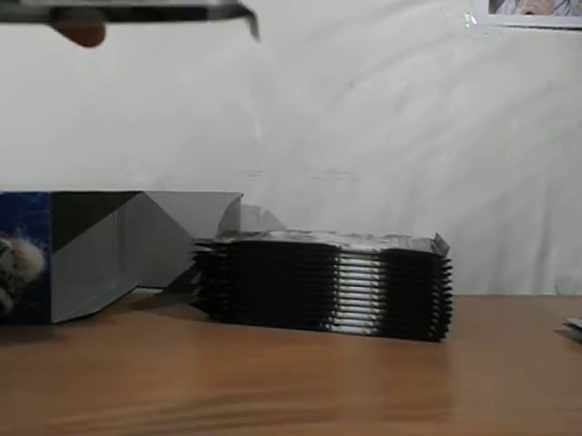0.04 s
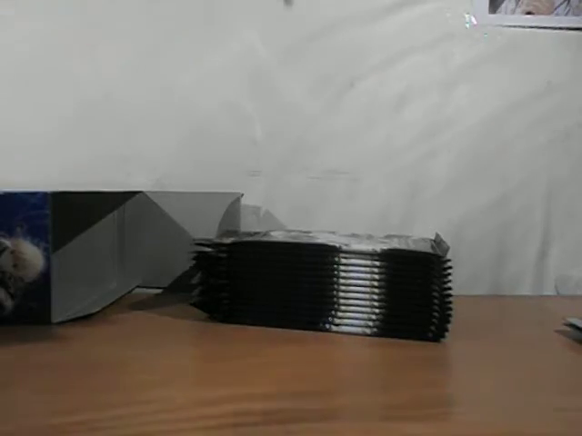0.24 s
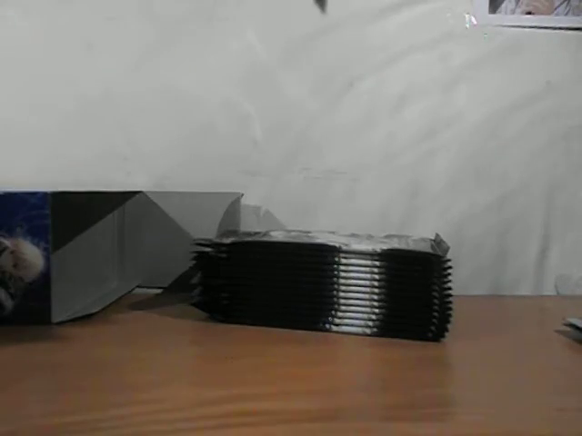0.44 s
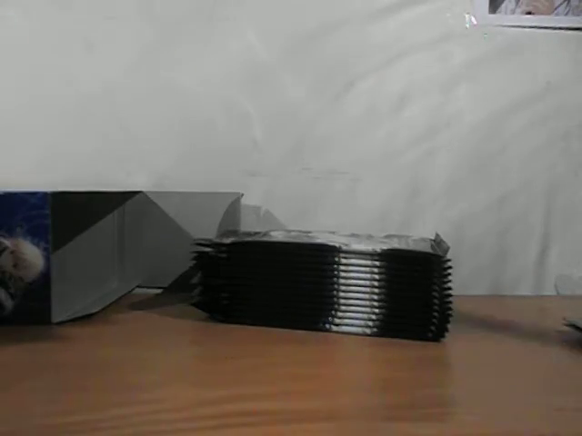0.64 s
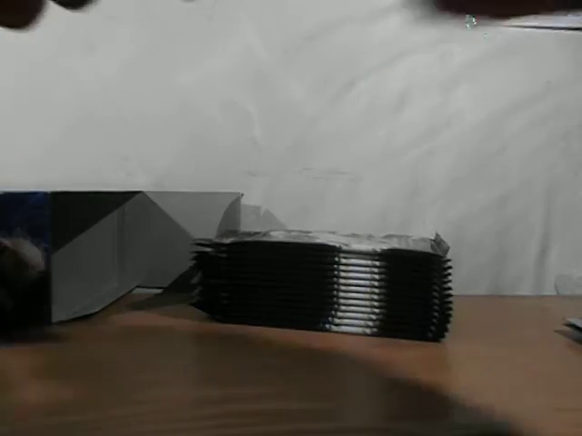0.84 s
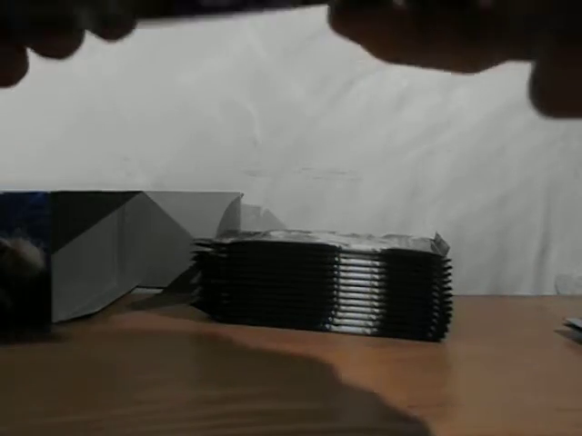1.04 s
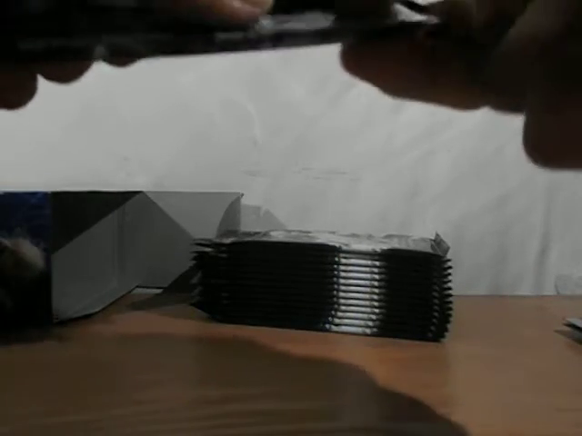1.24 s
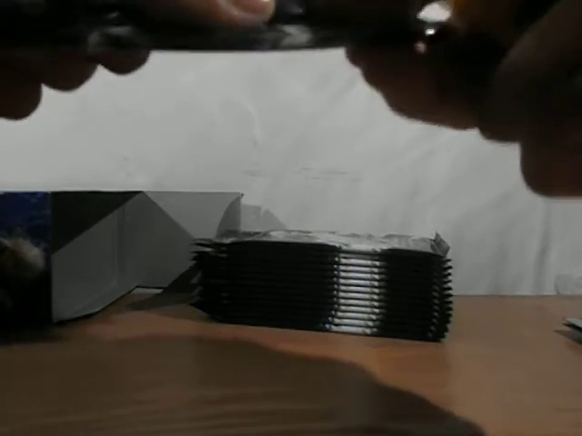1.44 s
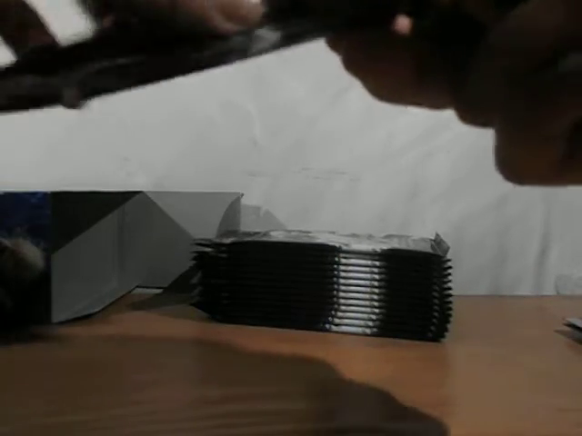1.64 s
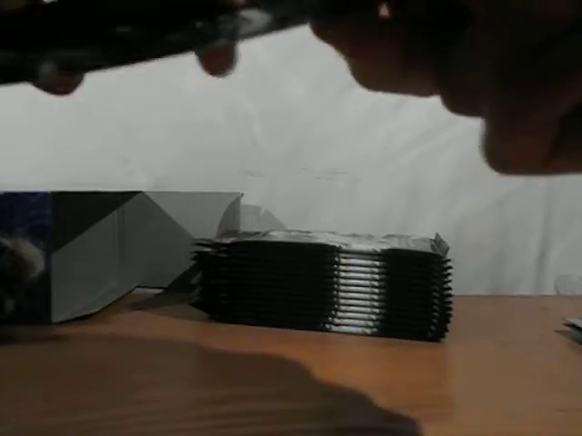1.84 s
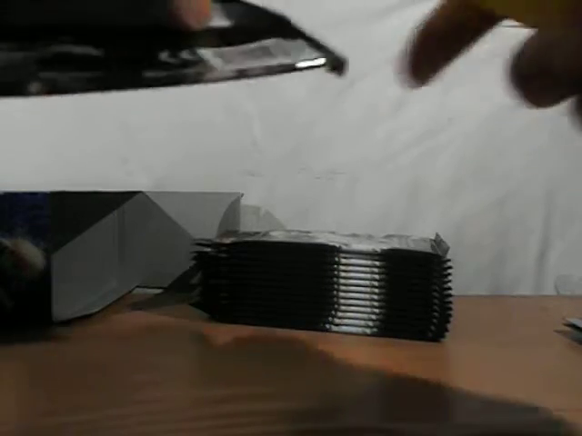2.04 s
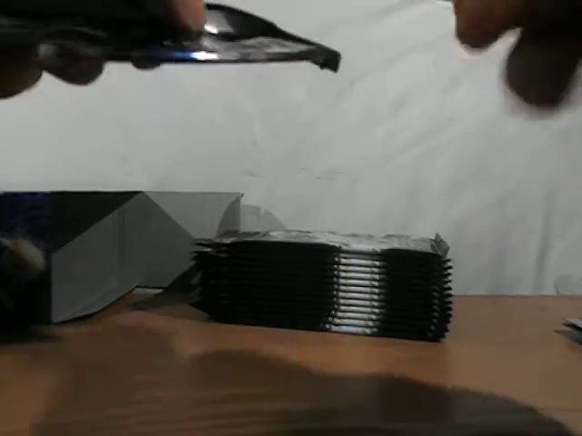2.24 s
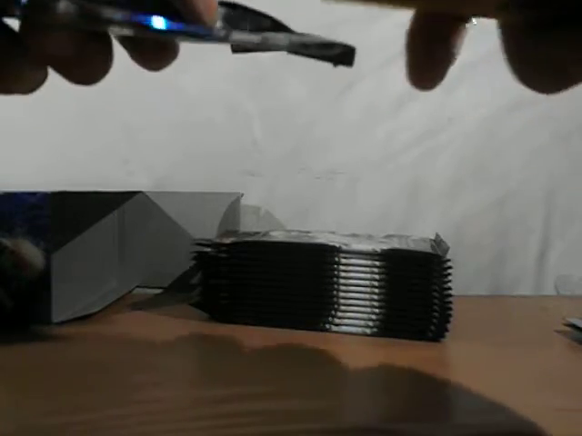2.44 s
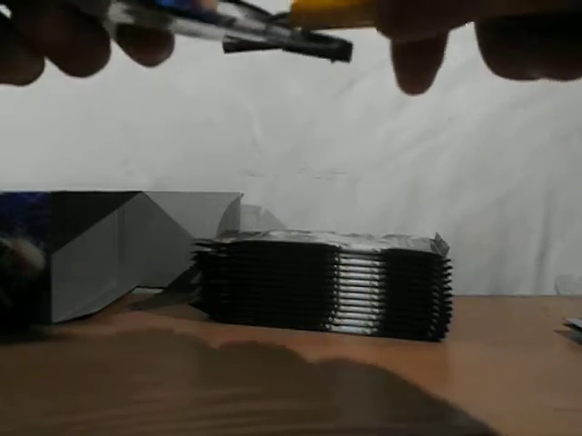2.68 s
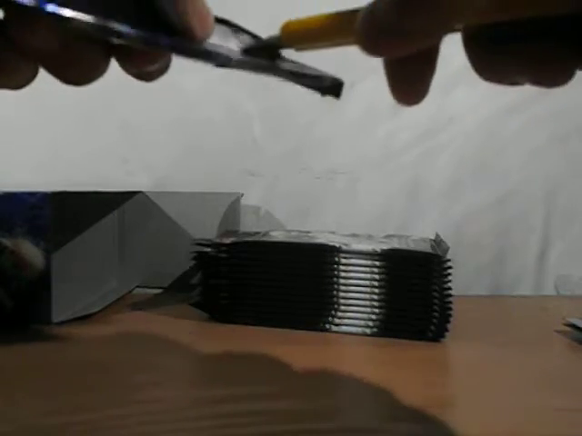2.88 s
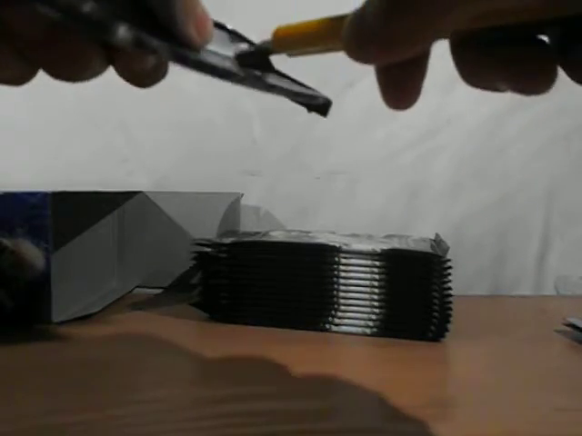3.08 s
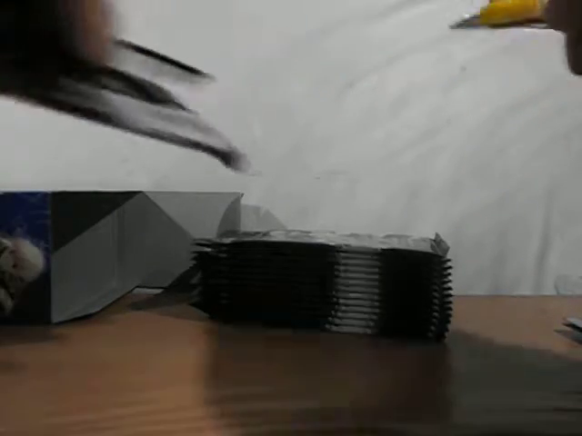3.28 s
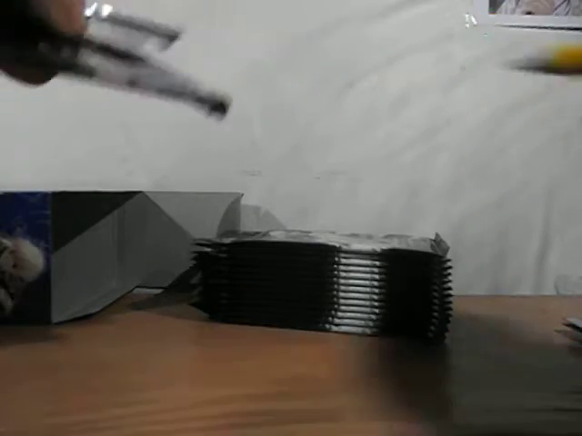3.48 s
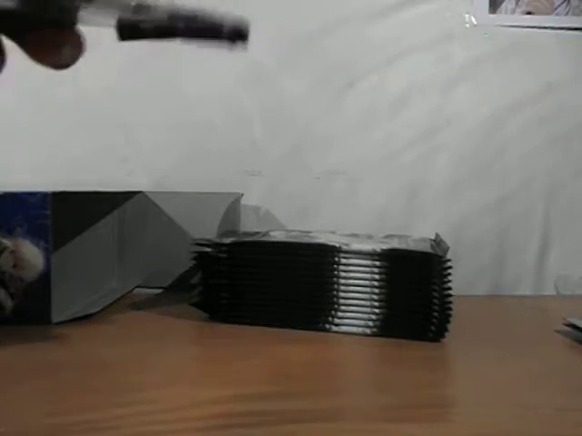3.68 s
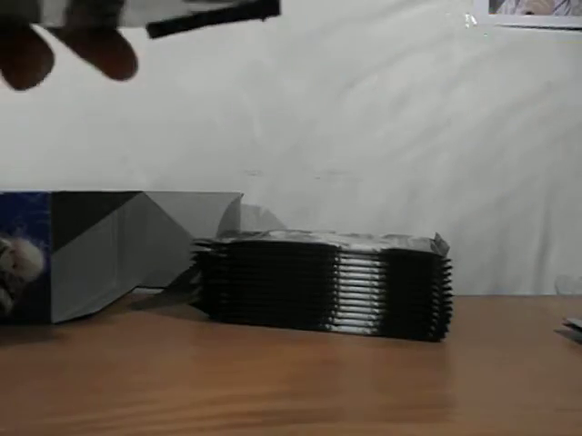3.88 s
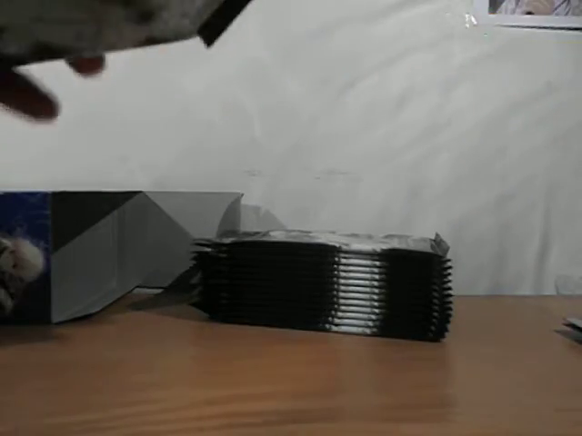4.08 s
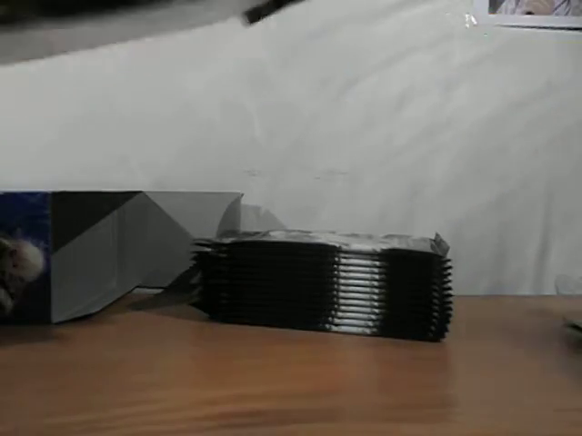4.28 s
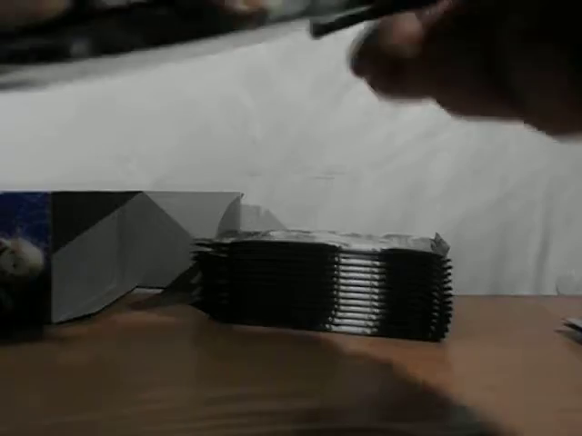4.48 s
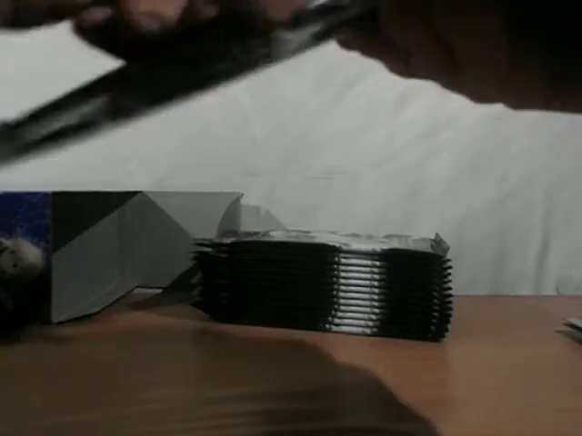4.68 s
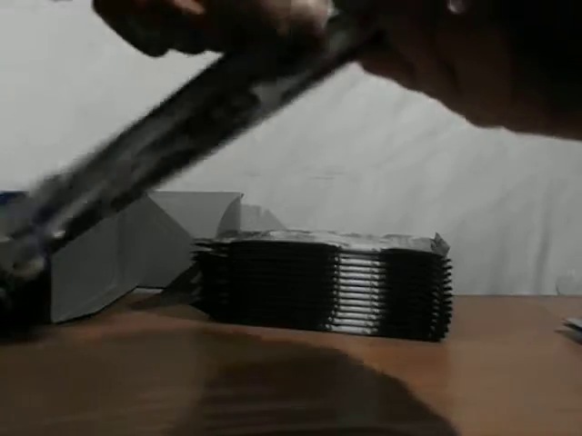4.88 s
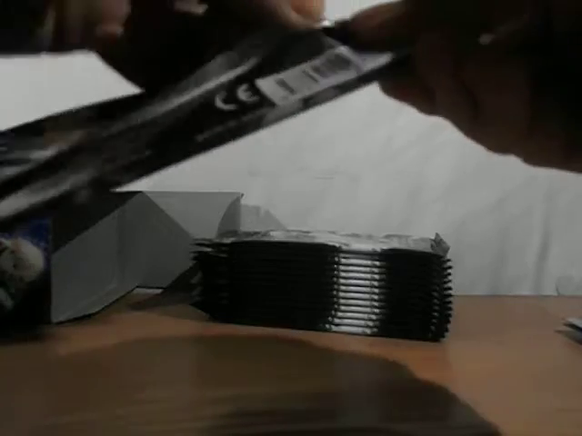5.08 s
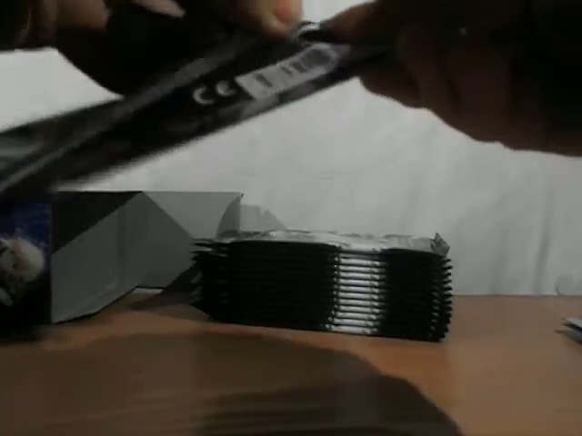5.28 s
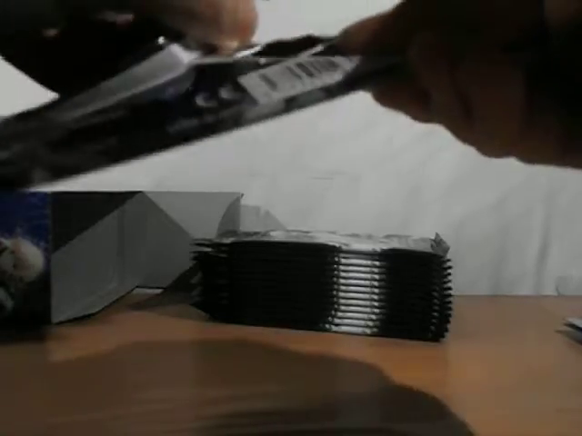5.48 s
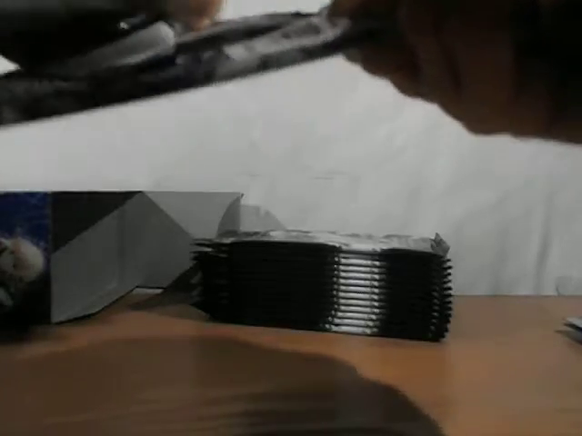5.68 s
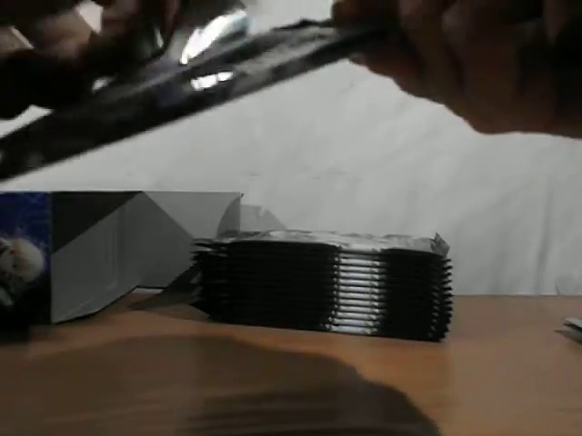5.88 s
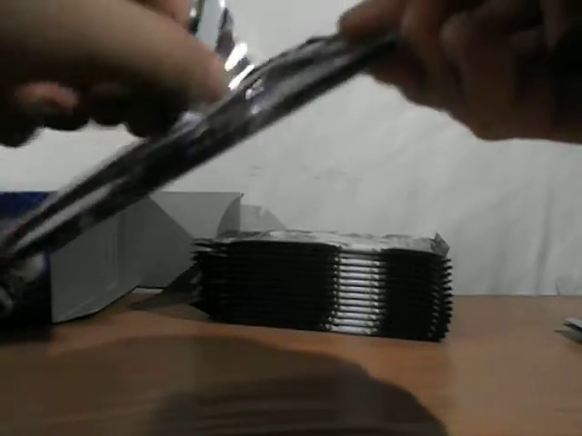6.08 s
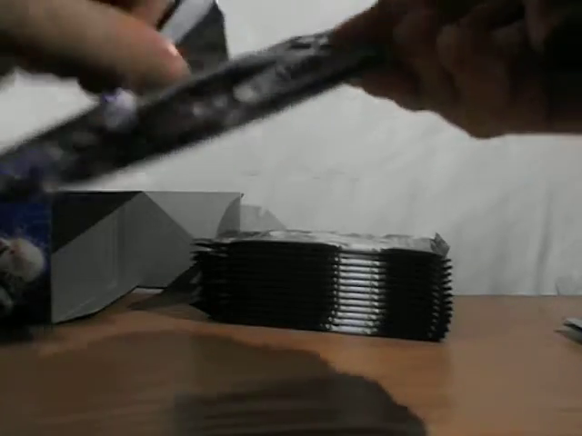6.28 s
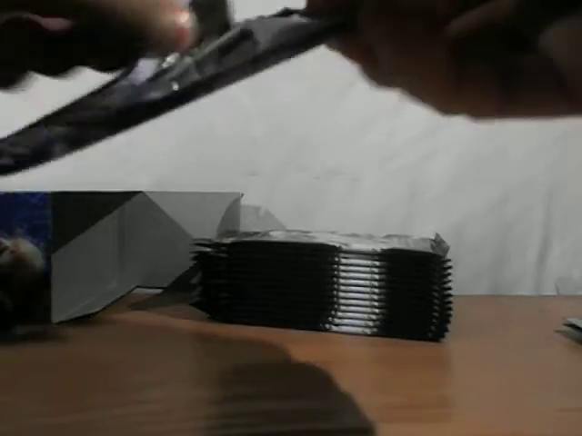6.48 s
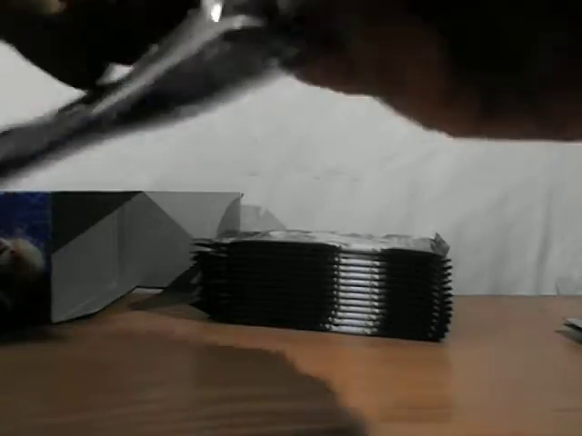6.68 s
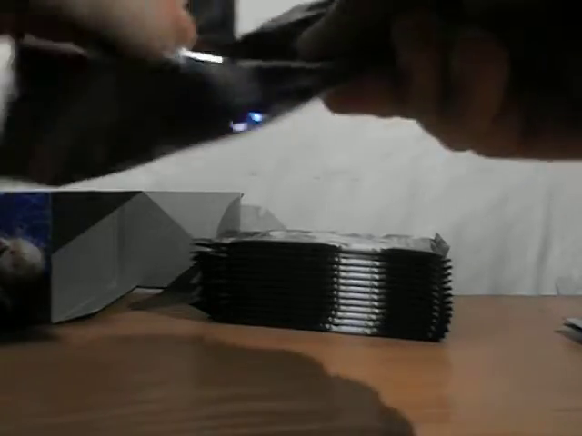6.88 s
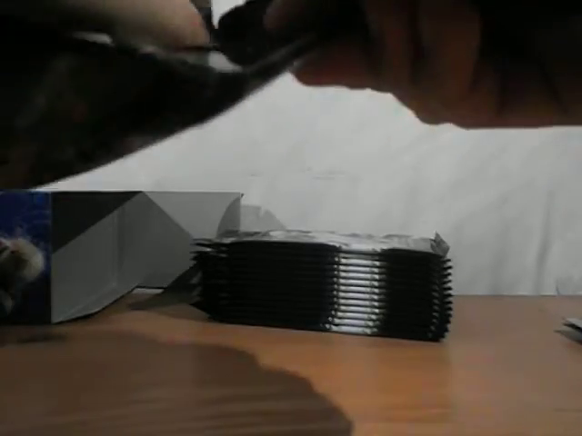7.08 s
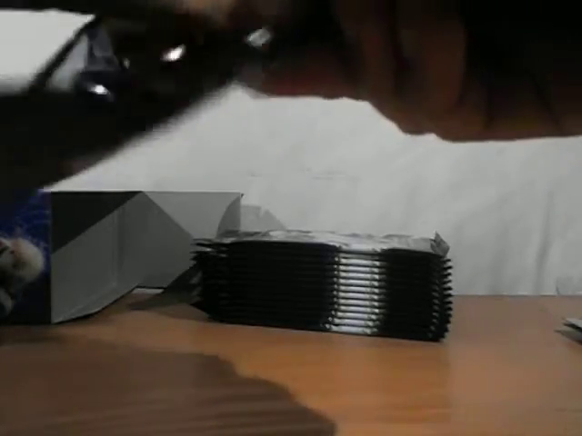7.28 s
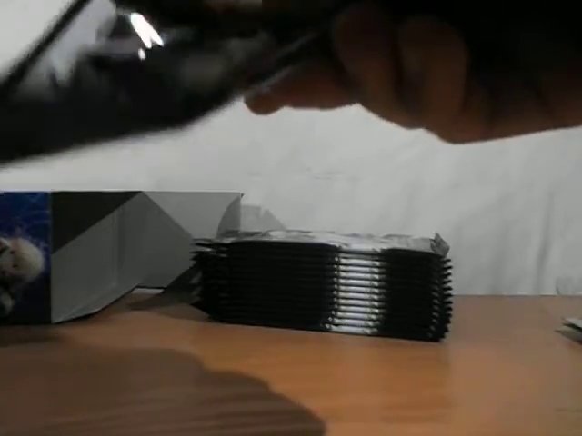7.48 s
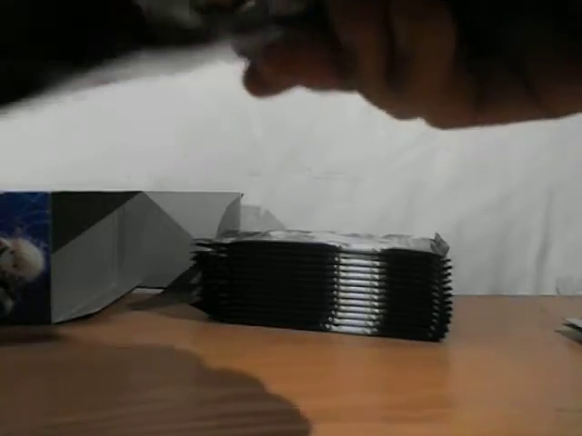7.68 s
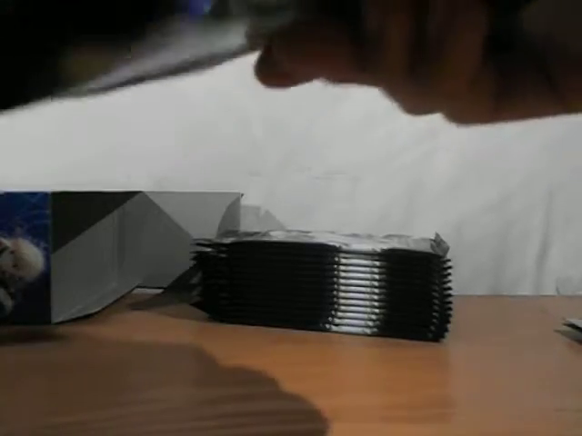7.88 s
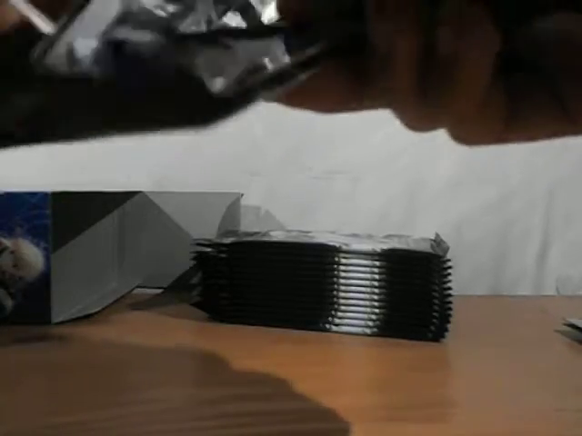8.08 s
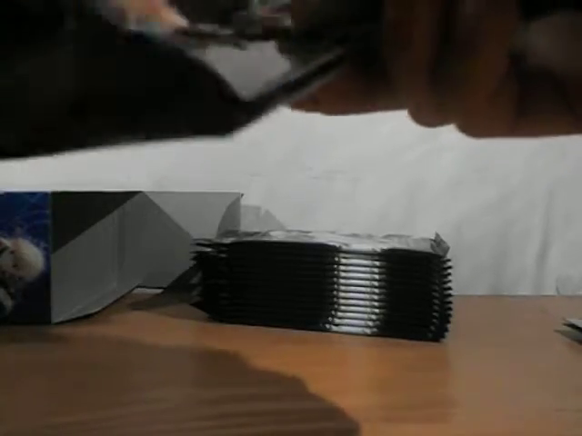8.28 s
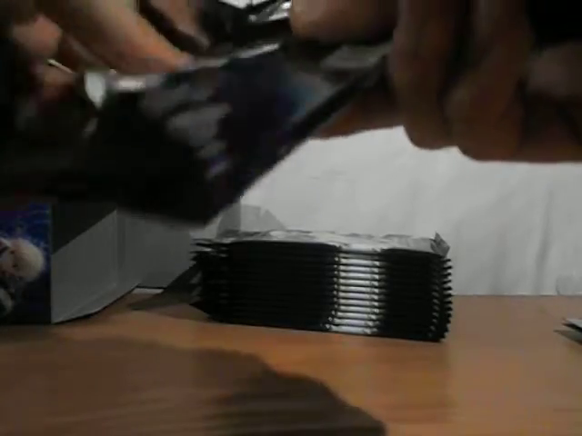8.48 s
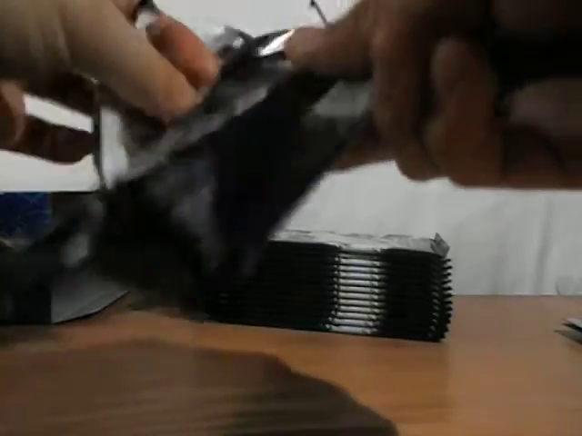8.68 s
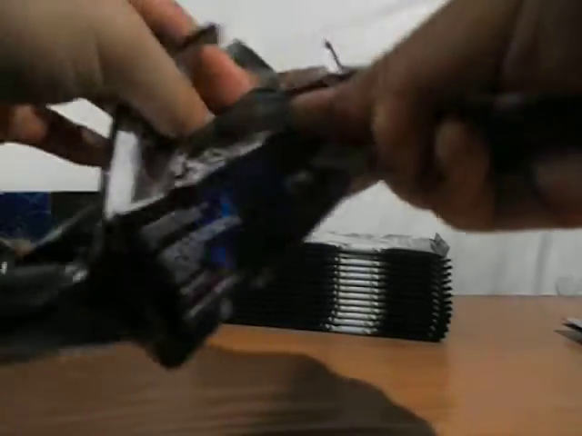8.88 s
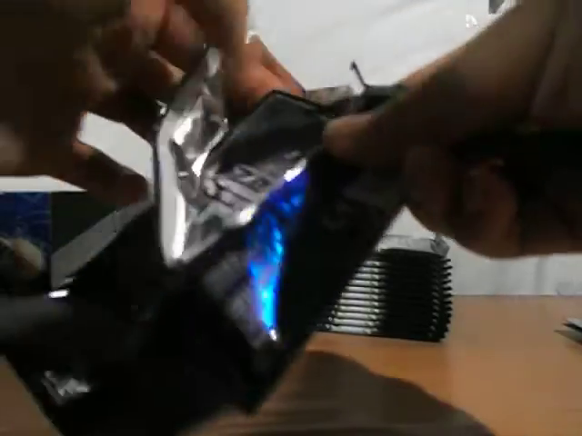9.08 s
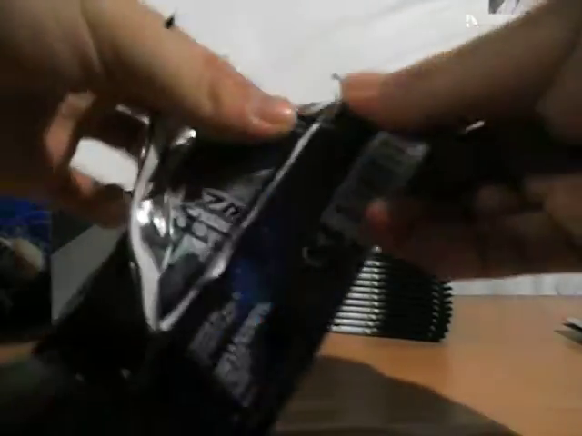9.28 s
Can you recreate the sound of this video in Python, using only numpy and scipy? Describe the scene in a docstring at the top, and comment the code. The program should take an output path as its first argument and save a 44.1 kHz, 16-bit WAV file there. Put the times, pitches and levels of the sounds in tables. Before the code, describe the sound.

Crisp foil packet crinkles and snaps close up, sparse at first, then denser and louder as its seam is tugged and torn open in a quiet room.

```python
"""A foil pack is crinkled, pulled and torn by hand, close to a small camera in a quiet room.
Creases are noise bursts ringing near 3-5 kHz with a low pouch thud, alone or in dense crackle.
The glued seam lets go in runs of quick slips; the table is bumped, and decaying sines thump and sway low.
Beneath lie hiss, hum and rumble. The camera cuts off near 6 kHz and overloads on the loudest snaps."""
import sys
import numpy as np
from scipy import signal
from scipy.fft import rfft, irfft
from scipy.io import wavfile
from scipy.ndimage import uniform_filter1d

SR = 44100
rng = np.random.default_rng(int(sys.argv[2]) if len(sys.argv) > 2 else 0)


def to_wav(s):
    """Save 16-bit WAV."""
    ch = np.atleast_2d(s).T  # columns
    pcm = np.round(np.clip(ch, -1, 1) * 32767)  # PCM
    wavfile.write(sys.argv[1], SR, pcm.astype(np.int16))


def rack_gain(trim_db):
    """Turn a fader trim in dB into the linear factor to multiply a signal by."""
    fader = np.asarray(trim_db, float)
    return 10 ** (fader / 20)


N = 411453


def evened(x):
    """Scales to rms 1."""
    return x / np.sqrt(np.mean(x ** 2) + 1e-20)


def read(points, hz):
    """Reads a spectrum table, linear in log frequency."""
    f, value = np.transpose(points)
    return np.interp(np.log(hz + 1), np.log(f + 1), value)


def curve(rows):
    """Draws a (time, value) table as straight segments, one value a sample."""
    s, value = np.transpose(rows)
    return np.interp(np.arange(N) / SR, s, value)


def coloured(gain):
    """Noise of rms 1 with the spectrum gain(hz)."""
    hz = np.fft.rfftfreq(N + 1, 1 / SR)
    spectrum = rfft(rng.standard_normal(N + 1)) * gain(hz)
    return evened(irfft(spectrum)[:N])


# colour of hiss and room tone: (frequency [Hz], relative level [dB])
ROOM_COLOUR = [(50, -11), (170, -2), (360, -14.5), (620, -11.5), (2470, -13.5), (3610, -17.5),
               (4910, -12.5), (5800, -25.5)]
# air movement at the microphone: (time [s], level [dB])
RUMBLE_LEVEL = [(0, -42.5), (9.33, -41)]


def background(tone_db=-53, hum_hz=119, hum_db=-59.5):
    """Steady hiss and room tone, a wavering narrow-band hum and a slow unsteady rumble."""
    tone = rack_gain(tone_db) * coloured(lambda hz: rack_gain(read(ROOM_COLOUR, hz)))
    hum = rack_gain(hum_db) * coloured(lambda hz: 1 / (1 + ((hz - hum_hz) / 4) ** 2))
    rumble = rack_gain(curve(RUMBLE_LEVEL)) * coloured(lambda hz: hz / (1 + (hz / 42) ** 5))
    return tone + hum + rumble


# low thumps and slow sways: (time [s], swing level before decay [dB], swing rate [Hz])
LOW_SWINGS = [(3.156, -19.5, 11), (5.277, -26.5, 14), (6.162, -20, 138), (6.629, -25.5, 65),
              (7.759, -24, 9)]


def low_swings(cycles=1.5):
    """Low thumps and slow sways: each a low swing that dies within a few cycles."""
    t, out = np.arange(N) / SR, np.zeros(N)
    for s, db, hz in LOW_SWINGS:
        since_s = t - s
        decay = np.exp(-np.maximum(since_s, 0) * hz / cycles)
        out += rack_gain(db) * np.sin(2 * np.pi * hz * since_s) * decay * (since_s > 0)
    return out


# low modes of the table: (frequency [Hz], starting level [dB], t60 [s])
TABLE_MODES = [(149.3, -0.5, 0.14), (210.5, -3, .06), (327, -7, 0.037), (587, 0, .03), (955, -2, 0.016)]
# hands against the table: (time [s], peak [dB], length of the push [s])
TABLE_BUMPS = [(4.113, -39, 0.017), (4.149, -13, 0.01), (4.523, -26, 0.029), (4.557, -19, 0.0565),
               (4.788, -32, 0.012), (6.639, -27, 0.016)]


def bumps():
    """A rough push, held for its length, rings the table's low modes through the camera's feet."""
    t, out = np.arange(SR // 2) / SR, np.zeros(N + SR)
    modes = sum(rack_gain(db - 60 * t / t60) * np.cos(2 * np.pi * hz * t) for hz, db, t60 in TABLE_MODES)
    for s, db, push_s in TABLE_BUMPS:
        rough = uniform_filter1d(rng.standard_normal(len(t)), 1 + round(push_s * SR / 20))  # slow is soft
        push = rough * np.exp(-(t / max(push_s, .001)) ** 3)
        knock = signal.fftconvolve(push, modes)[:len(t)]
        out[round(s * SR):][:len(t)] += rack_gain(db) * knock / abs(knock).max()
    return out[:N]


# squeezes: (time of the top [s], handling level there [dB], swell [s], fade [s])
SQUEEZE_TOPS = [(0.018, -37, 0.049, 0.021), (0.1, -42, 0.058, 0.14), (0.378, -35, 0.0096, 0.02),
                (0.68, -48, 0.026, 0.029), (0.892, -30.5, 0.029, 0.011), (0.99, -42, 0.058, 0.19),
                (1.258, -37, 0.011, 0.11), (1.43, -39, 0.075, 0.02), (1.499, -29.5, 0.031, 0.32),
                (1.649, -26.5, 0.014, 0.014), (1.89, -31.5, 0.065, 0.048), (2.031, -34.5, 0.047, 0.026),
                (2.151, -37.5, 0.075, 0.037), (2.36, -36, 0.03, 0.01), (2.879, -33.5, 0.14, 0.16),
                (3.161, -27.5, 0.034, 0.05), (3.37, -39.5, 0.045, 0.052), (3.491, -33.5, 0.045, 0.075),
                (4.021, -40, 0.085, 0.033), (4.161, -23, 0.045, 0.024), (4.511, -32, 0.042, 0.058),
                (4.629, -31, 0.028, 0.13), (4.918, -34.5, 0.16, 0.17), (5.029, -21, 0.014, 0.017),
                (5.313, -27, 0.081, 0.053), (5.778, -36.5, 0.14, 0.2), (6.062, -29, 0.059, 0.028),
                (6.148, -22, 0.025, 0.037), (6.499, -28, 0.087, 0.091), (6.65, -29, 0.23, 0.067),
                (6.77, -23.5, 0.21, 0.016), (7.049, -22.5, 0.073, 0.093), (7.251, -26.5, 0.11, 0.041),
                (7.362, -29.5, 0.074, 0.079), (7.57, -21.5, 0.092, 0.018), (7.74, -14.5, 0.029, 0.058),
                (8.0, -32, 0.083, 0.14), (8.268, -29, 0.14, 0.039), (8.58, -35, 0.12, 0.23),
                (8.77, -32, 0.034, 0.058), (8.98, -28, 0.054, 0.072), (9.171, -20.5, 0.034, 0.035),
                (9.33, -27, 0.072, 0.021)]
# merely holding the pack: (time [s], handling level [dB])
GRIP_LEVEL = [(0, -53), (2.5, -49), (4.4, -48.5), (6.3, -44.5), (7.65, -47), (7.8, -36), (9.33, -41)]


def handling(swell_db=15):
    """Handling level in dB: grip plus squeezes, each climbing swell_db in its swell, losing it in its fade."""
    t, power = np.arange(0, N + 64, 64) / SR, 0
    for top, db, swell_s, fade_s in SQUEEZE_TOPS:
        away = np.where(t < top, (top - t) / max(swell_s, .003), (t - top) / max(fade_s, .003))
        power = power + rack_gain(db - swell_db * away ** 1.47) ** 2  # rounded at its top
    power = np.interp(np.arange(N) / SR, t, power) + rack_gain(curve(GRIP_LEVEL)) ** 2
    return 10 * np.log10(power)


def flexing(below_db=-14.5):
    """The whole pack bends in the hands and pushes air in soft low lumps."""
    return rack_gain(below_db + handling()) * coloured(lambda hz: 1 / (1 + (hz / 170) ** 3))


# broad colour of a snap at the microphone: (frequency [Hz], level [dB])
FOIL_COLOUR = [(200, -15), (380, -27.5), (520, -16), (1020, -8.5), (1800, -5), (3000, -2), (5100, -2.5),
               (5900, -14)]


def snap_shapes(ring_hz, thud_db, burst_s=0.00048, ring_width_hz=800, flat_db=-12):
    """One snap a row, crease peak 1: a burst of noise rings the crease and thumps the pouch."""
    t, hz = np.arange(1024) / SR, np.fft.rfftfreq(1024, 1 / SR)
    noise = rng.standard_normal((len(ring_hz), 1024))
    spread = np.exp(0.46 * rng.standard_normal((len(ring_hz), 1)))  # each crease takes its own time
    u = np.maximum(t - .002, 0) / (burst_s * spread)
    colour = rack_gain(read(FOIL_COLOUR, hz))
    quick = rfft(noise * u * np.exp(-u)) * colour
    slow = rfft(noise * u * np.exp(-u / 2.5)) * colour  # the pouch rings longer
    ring = 1 / (1 + ((hz - ring_hz[:, None]) / ring_width_hz) ** 2) + rack_gain(flat_db)
    low = 1 / (1 + (hz / 1500) ** 6)
    crease = irfft(quick * ring * (1 - low))
    pouch = irfft(slow * low)
    crease = crease / abs(crease).max(1, keepdims=True)
    pouch = pouch / abs(pouch).max(1, keepdims=True)
    return crease + rack_gain(np.minimum(thud_db, 0))[:, None] * pouch


def lay(s, db, shapes):
    """Adds every shape at its time and level; shapes start 2 ms early."""
    at = np.round((s - .002) * SR).astype(int)[:, None] + np.arange(shapes.shape[1])
    return np.bincount(np.clip(at, 0, N).ravel(), (rack_gain(db)[:, None] * shapes).ravel(), N + 1)[:N]


def peel(start, end, rate0, rate1, db0, db1, ring_hz):
    """Glue sticks and slips; the slips come at a gliding, slightly uneven rate."""
    t = np.arange(start, end, 1 / SR)
    turns = np.cumsum(np.geomspace(rate0, rate1, len(t))) / SR
    s = np.r_[start, t[1:][np.diff(turns // 1) > 0]]
    s = s + .00015 * rng.standard_normal(len(s))
    shapes = snap_shapes(np.full(len(s), ring_hz), np.full(len(s), -20.),
                         burst_s=.00025, ring_width_hz=750, flat_db=-30)
    return lay(s, np.interp(s, [start, end], [db0, db1]), shapes)


# seam peeling: (start [s], end [s], slip rate at start [1/s], at end [1/s],
#                crease peak at start [dB], at end [dB], ring [Hz])
SEAM_PEELS = [(6.571, 6.645, 1040, 1740, -26, -25, 3330), (6.778, 6.802, 370, 360, -9, -16, 3260),
              (6.837, 6.879, 100, 800, -8, -6.5, 3100)]


def peels():
    """The glued seam lets go in short runs of slips."""
    return sum(peel(*row) for row in SEAM_PEELS)


def crackle(spread_db=5.5, crowding=.4, thud_db=-15, count=40):
    """Many small creases, a few of them larger; harder handling makes them both louder and denser."""
    shapes = snap_shapes(np.linspace(2600, 4800, count), rng.normal(thud_db, 7.95, count))
    level_db = handling()
    per_s = crowding * np.interp(level_db, [-50, -20], [200, 900])
    size = evened(rack_gain(spread_db * np.minimum(rng.exponential(1, N), 3)))
    struck = rng.random(N) < per_s / SR
    strikes = rack_gain(level_db) * size * struck * np.sqrt(SR / per_s)  # density leaves the level alone
    place = coloured(lambda hz: hz < 25) + .6 * rng.standard_normal(N)  # neighbouring creases ring alike
    kind = np.clip(count * (.5 + place / 4), 0, count - 1).astype(int)
    out = sum(signal.oaconvolve(strikes * (kind == k), shape)[:N] for k, shape in enumerate(shapes))
    return out / np.sqrt((shapes ** 2).sum(1).mean())


def rustle():
    """Foil slides on foil, finer and more even than buckling; sliding catches and lets go in patches."""
    patchy_db = 3 * coloured(lambda hz: hz < 40)
    return rack_gain(patchy_db - 10.5) * crackle(spread_db=2.5, crowding=4, thud_db=-20)


def buckling():
    """Small creases crackle, above the rustle at every touch, slightly stronger when handling is firm."""
    return rack_gain(np.interp(handling(), [-45, -25], [-3, -1])) * crackle()


# creases snapping: (time [s], crease peak [dB], pouch thud re crease, at most 0 [dB])
CREASE_SNAPS = [(0.0939, -18.5, -32), (0.1959, -16, -18), (0.287, -25.5, -24), (0.3106, -22, -23),
                (0.663, -28.0, -33), (0.6912, -20.5, -38), (0.7296, -23.5, -35), (0.97, -14, -9.5),
                (1.038, -12, -16), (1.0554, -16, -11.5), (1.1934, -12.5, -10.5), (1.2526, -21, -4.5),
                (1.3252, -13, -12), (1.5152, -11.0, -13), (1.5217, -13, -17), (1.5381, -3.0, -18.5),
                (1.5574, -4, -36), (1.5695, -0.5, -22), (1.6504, -5.5, -12.5), (1.7734, -18.5, -12.5),
                (1.8242, -14, -12), (1.826, -12.0, -17), (1.8403, -14, -20), (1.8943, -5.5, -25.5),
                (1.962, -5.5, -29.5), (2.0024, -15.5, -30), (2.029, -12.5, -34), (2.1164, -12.5, -43),
                (2.1634, -9.5, -16.5), (2.2028, -7.5, -25), (2.3948, -12.5, -30), (2.4252, -19, -33),
                (2.5776, -23, -27), (2.6164, -27.5, -14), (2.8459, -4.5, -36), (2.865, -11, -20),
                (2.89, -14, -22), (2.9051, -11, -25), (2.9182, 1.5, -24), (2.9448, -16, -15),
                (2.9553, -1.5, -24), (2.975, 0.5, -30), (3.0255, -10.5, -13.5), (3.1216, -12, -46),
                (3.1394, -13.5, -27), (3.1545, 0, -15), (3.1612, -7.5, -11.5), (3.2148, -18, -10.5),
                (3.3532, -9.5, -17.5), (3.4052, -9.5, -35), (3.5254, -13.5, -16), (3.5291, -20.5, -18),
                (3.533, -13.5, -18), (3.5486, -14, -17), (3.722, -7, -37), (3.7813, -18.5, -20),
                (3.9146, -13, -14), (4.0216, -22, -27), (4.1567, -2.5, -27), (4.3506, -15.5, -13),
                (4.5014, -6.5, -15), (4.508, -16, -9), (4.5217, -12.5, -41), (4.5285, -2.0, -36),
                (4.5448, -10.5, -36), (4.6162, -12, -19), (4.6205, -14.5, -16), (4.6264, -13.5, -18),
                (4.6294, -10.5, -14), (4.6493, -9, -22), (4.659, -14, -15), (4.6667, -15.5, -17),
                (4.677, -10, -19), (4.7953, -18.5, -18), (4.81, -11.0, -21), (4.8626, -9, -22),
                (4.9041, -8, -23), (4.918, -7.5, -20), (4.924, -19, -24), (4.9425, -6.5, -16),
                (4.9483, -9.5, -11), (4.9706, -3, -18.5), (5.0287, -7.5, -12.5), (5.0371, -10.5, -12),
                (5.056, -10, -19), (5.0804, -3, -34), (5.099, -9.5, -13), (5.1496, -16.5, -17),
                (5.2523, -19, -15), (5.267, -16.0, -34), (5.279, -15.5, -13), (5.2893, -14, -14),
                (5.2947, -11.5, -12), (5.2995, -9, -17), (5.3137, -4.5, -19), (5.321, -12.5, -21),
                (5.4703, -24.5, -6.5), (5.6428, -13.5, -9), (5.7546, -6, -17), (5.79, -6.5, -18),
                (5.794, -15, -12.5), (6.0355, -11.5, -18), (6.1424, -2.5, -24.5), (6.1529, -13, -3),
                (6.1569, -11.5, -5), (6.169, -14, -9.5), (6.1826, -5.5, -36), (6.2587, -21, -11),
                (6.3638, -18.5, -28), (6.3958, -15.5, -14), (6.42, -12.5, -15), (6.437, -10, -21),
                (6.49, -13, -11.5), (6.5248, -4, -17.5), (6.6804, -10, -9.5), (6.6967, 1, -31),
                (6.7514, -2, -16), (6.7769, -3, -34), (6.8944, -7, -38), (6.9053, -5, -16),
                (6.9217, -12.5, -6), (7.0182, -1.5, -12.5), (7.0539, -6, -19), (7.0636, -10.5, -7),
                (7.0843, -14.5, 0.5), (7.096, -12.5, -6.5), (7.1949, -7, -9), (7.2573, -4.5, -14),
                (7.2687, -10, -11), (7.2821, -10.5, -21), (7.2877, -1.5, -25), (7.3555, -7.5, -14),
                (7.3622, -8.5, -14), (7.368, -12.5, -16), (7.4014, -2, -17), (7.438, -0.5, -15),
                (7.5017, -3.5, -17), (7.5064, 1, -13), (7.5118, -6, -10), (7.5197, -8, -25),
                (7.544, -1.5, -28), (7.5504, 0, -23), (7.5576, 2.5, -18), (7.5605, 1, -22),
                (7.5809, -0.5, -12), (7.5866, -4, -16), (7.5923, 2.5, -13), (7.6898, -3.5, -9),
                (7.7226, -6, -36), (7.7278, -4.5, -16), (7.7392, -4.5, -12.5), (7.7461, -10.5, 0),
                (7.75, -7.5, 0), (7.7586, -3, -8), (7.767, -0.5, -11), (7.8055, -9.5, -18),
                (7.8587, -19, -16), (7.8764, -7, -10.5), (7.9634, -8.5, -17.5), (7.9886, -6, -20),
                (8.0184, -10.5, -22), (8.0347, -3.5, -21), (8.269, -4, -9), (8.2818, 0, -9),
                (8.3128, -7, -13), (8.344, -6.5, -17), (8.376, -4, -16.5), (8.399, -5.5, -20),
                (8.4171, -0.5, -14), (8.4584, -10, -35), (8.4686, -10, -36), (8.4734, -7.5, -38),
                (8.5002, -6, -31.5), (8.5622, -2, -22), (8.5875, -7.5, -16.5), (8.6019, -5, -7.5),
                (8.6317, -12, -25), (8.747, -16, -20.5), (8.8877, -3, -15.5), (8.9594, -14.5, -4),
                (8.9994, -15, -11), (9.0996, -17, -1.5), (9.124, -7.0, -15), (9.1635, -8, -14),
                (9.1693, -11.5, -7.5), (9.1736, -7, -18), (9.206, -2.5, -25), (9.2417, -7.5, -19),
                (9.2479, -7.5, -10.5), (9.2555, -12, -14), (9.3163, -14, -2.5)]


def snaps():
    """The single creases that stand out; each rings at its own pitch, lower when it thumps the pouch hard."""
    s, db, thud_db = np.transpose(CREASE_SNAPS)
    ring_hz = 3000 - 30 * np.maximum(thud_db, -30) + 300 * rng.standard_normal(len(s))
    return lay(s, db, snap_shapes(ring_hz, thud_db))


# off the wall: (delay [s], level [dB])
WALL_ECHOES = [(.0041, -17.5)]


def room(x, tail_db=-20, t60=0.089):
    """The direct sound, a wall reflection, then a short diffuse tail."""
    t = np.arange(SR // 3) / SR
    tail = rng.standard_normal(len(t)) * rack_gain(-60 * t / t60) * (t > .004)
    taps = rack_gain(tail_db) * tail / np.linalg.norm(tail)
    for s, db in [(0.00012, 0.008), *WALL_ECHOES]:
        taps[round(s * SR)] += rack_gain(db)
    return signal.oaconvolve(x, taps)[:N]


def scene():
    """Foil sounds in the room, over flexing, bumps, low swings and background."""
    foil = snaps() + buckling() + rustle() + peels()
    return (room(foil) + flexing() + bumps() + low_swings() + background())[None]


def low_pass(x):
    """Removes everything above the highest recorded frequency."""
    return signal.sosfilt(signal.butter(12, 16600, fs=SR, output="sos"), x)


def record(dry, edge_hz=5947, clip_level=.72, recovery_db_per_s=190.0):
    """Steep band limit; the gain ducks just after an overload; hard clipping sprays overtones above the limit."""
    lowpass = signal.firwin(201, edge_hz, window=("kaiser", 9), fs=SR)
    narrow = signal.oaconvolve(dry, lowpass[None], "same")
    over_db = np.maximum(20 * np.log10(abs(narrow[0]) + 1e-9) + 5, 0)  # above -5 dB
    fall_db = np.arange(N) * recovery_db_per_s / SR
    duck_db = np.maximum.accumulate(1.16 * over_db + fall_db) - fall_db
    duck_db = signal.lfilter([1 / 60], [1, 1 / 60 - 1], duck_db)  # lags by about 60 samples
    clipped = np.clip(narrow / rack_gain(duck_db), -clip_level, clip_level)
    return low_pass(clipped - .0028)  # small DC offset


dry = scene()
out = record(dry)
to_wav(out)
```